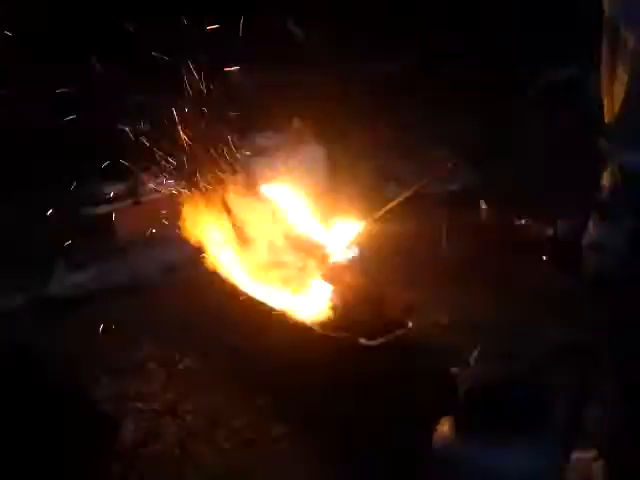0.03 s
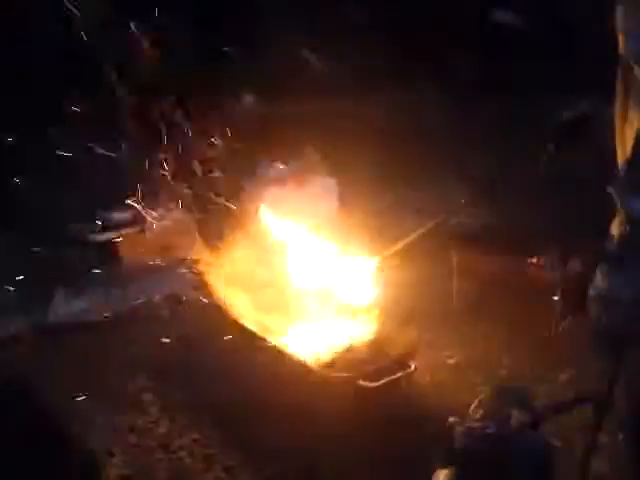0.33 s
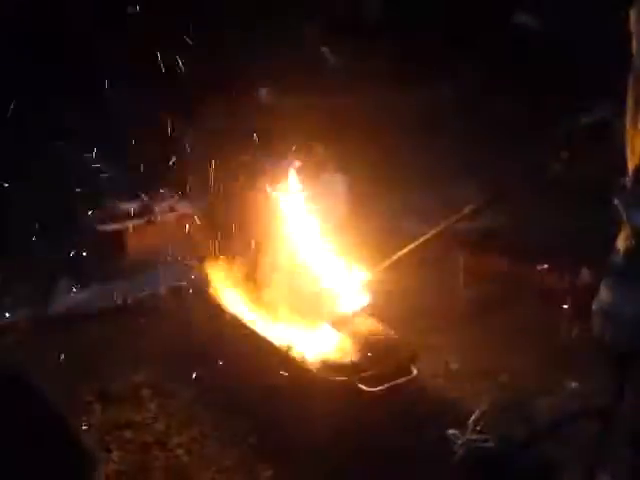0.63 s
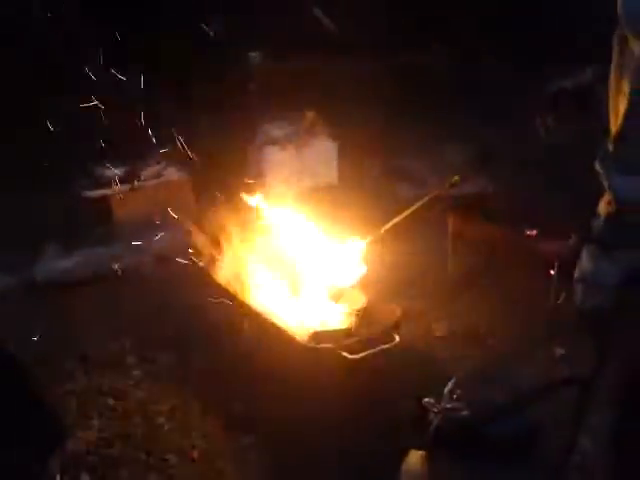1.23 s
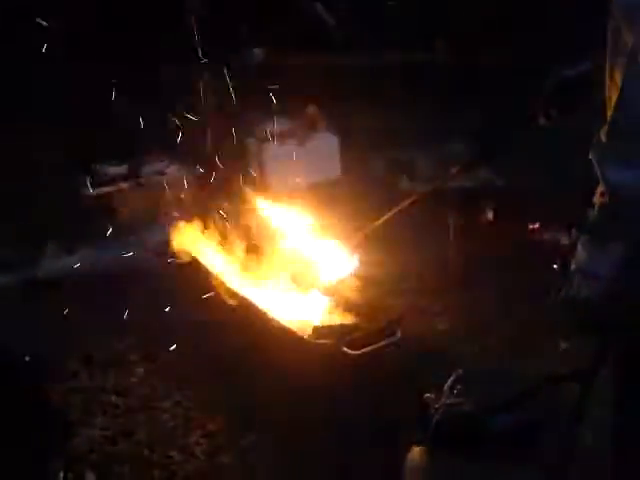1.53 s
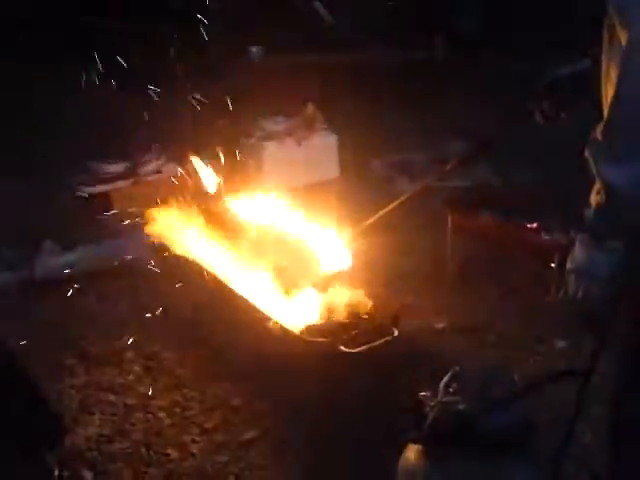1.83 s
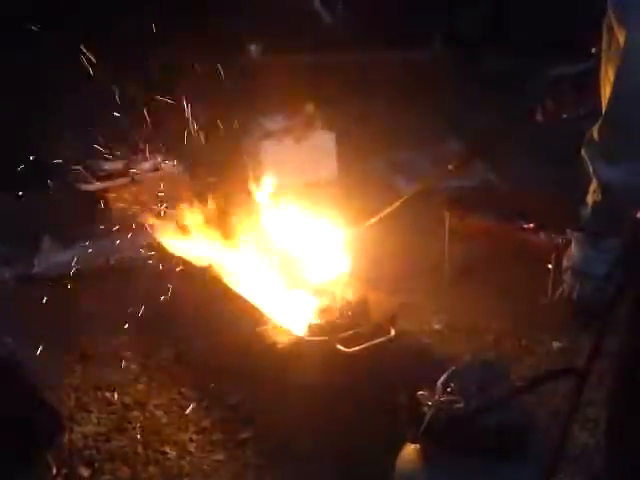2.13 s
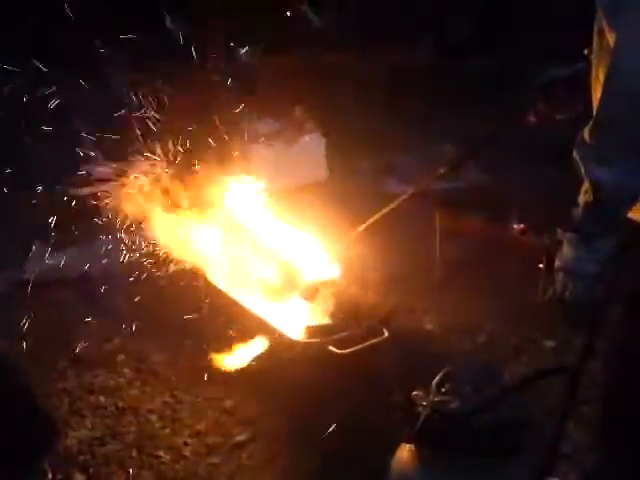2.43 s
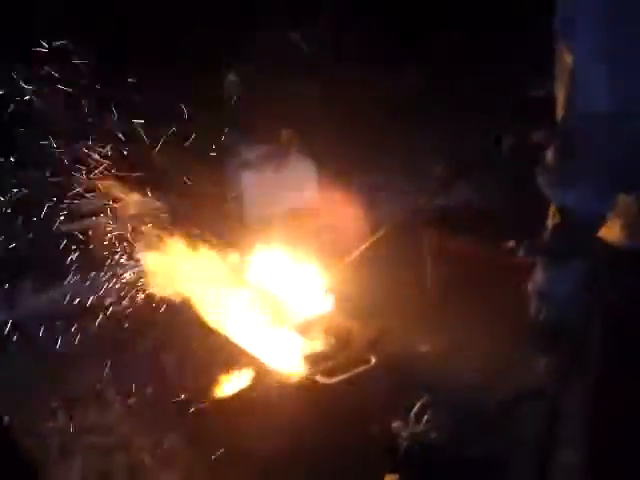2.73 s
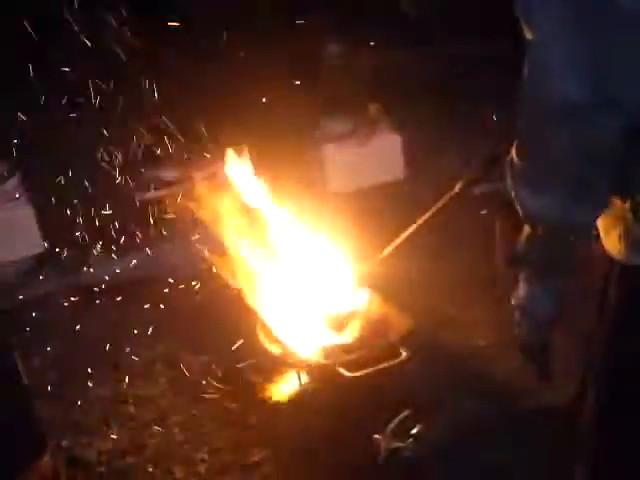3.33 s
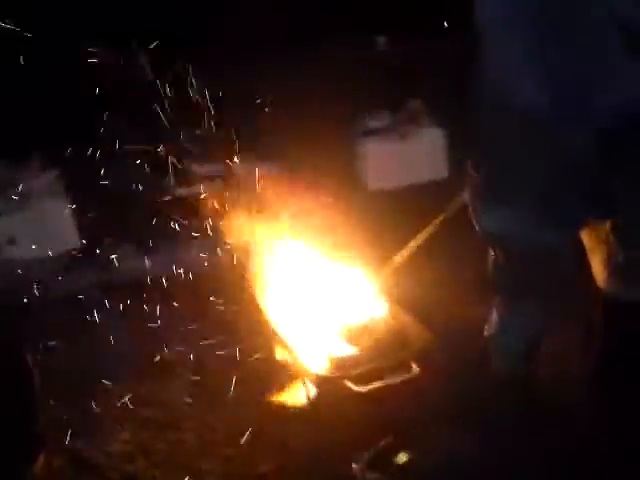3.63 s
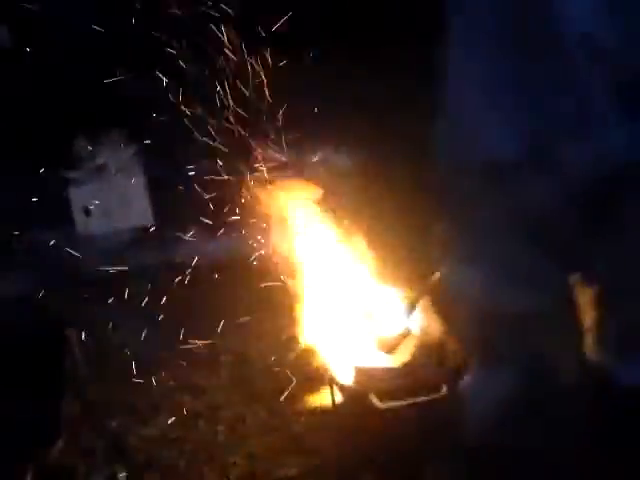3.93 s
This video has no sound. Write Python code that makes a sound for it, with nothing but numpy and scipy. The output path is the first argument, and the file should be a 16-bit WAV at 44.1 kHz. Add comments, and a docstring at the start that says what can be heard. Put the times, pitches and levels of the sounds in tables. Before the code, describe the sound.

A strong charcoal fire roars outdoors as forced air swells through the coals with a breathy whistle. Sharp snaps break in where the close microphone overloads, a few at first, then in thicker clusters.

```python
"""Outdoors at night, a narrow-band microphone stands close to a charcoal fire in a trough.
From the start, turbulence roars in a deep fixed body, and strokes of forced air swell and glide in
three breathy resonances. At the height of the surges the microphone overloads and the roar breaks into
sharp snaps: a few at first, then clusters near 1.6 s and 2.3 s. Faint ticks dot the loudest stretches.
From 3.2 s to 3.7 s the snaps come thickest, four with a dull thump; then the fire roars on."""
import sys
import numpy as np
from scipy.fft import rfft, irfft, next_fast_len
from scipy.io import wavfile
from scipy.ndimage import uniform_filter1d, map_coordinates

SR = 44100
rng = np.random.default_rng(int(sys.argv[2]) if len(sys.argv) > 2 else 0)


def digitize_waveform(pressure):
    """Quantize a signal to 16-bit integers and store it at the path in sys.argv[1].

    Rows of a 2-D input are taken as channels; values are limited to [-1, 1].
    """
    field = np.atleast_2d(pressure).T
    bounded = np.clip(field, -1, 1)
    quanta = np.round(bounded * 32767).astype(np.int16)
    wavfile.write(sys.argv[1], SR, quanta)


N = 176400  # 4 s


def amp(db):
    """Decibels to gain."""
    return 10 ** (np.asarray(db) / 20)


def unit_rms(x):
    """Scale to rms 1."""
    return x / np.sqrt(np.mean(x ** 2) + 1e-20)


def curves(rows):
    """One value per sample for each column after the time."""
    times, *columns = np.transpose(rows)
    return [np.interp(np.arange(N) / SR, times, column) for column in columns]


def wobble(knots_per_s):
    """A smooth random curve."""
    return map_coordinates(rng.standard_normal(1024), [np.arange(N) * knots_per_s / SR], mode="wrap")


def filtered(x, response):
    """Filter x by a gain given as a function of frequency in Hz."""
    size = next_fast_len(N + SR // 2)
    hz = np.fft.rfftfreq(size, 1 / SR)
    return irfft(rfft(x, size) * response(hz), size)[..., :N]


def coloured(x, spectrum):
    """Shape x by (Hz, dB) points, falling 12 dB an octave above the last one."""
    points_hz, points_db = np.transpose(spectrum)

    def response(hz):
        gain_db = np.interp(np.log(hz + 1), np.log(points_hz), points_db)
        return amp(gain_db) / np.maximum(hz / points_hz[-1], 1) ** 2
    return filtered(x, response)


def low_pass(x, edge_hz):
    """A steep upper band edge."""
    return filtered(x, lambda hz: 1 / np.sqrt(1 + (hz / edge_hz) ** 70))


def overload(x, ceiling):
    """The microphone rounds off peaks as they near its ceiling."""
    return x / (1 + (x / ceiling) ** 8) ** (1 / 8)


def turbulence(levels, spectrum, flutter_db, flutter_per_s):
    """Turbulence in a fixed body: noise that follows a level curve and flutters."""
    level_db, = curves(levels)
    gain = amp(level_db + flutter_db * wobble(flutter_per_s))
    return gain * unit_rms(coloured(rng.standard_normal(N), spectrum))


def resonance(track, half_width_hz, skirt_slope, waver_hz):
    """Turbulence in one breathy resonance: a narrow noise band that glides along a track and wavers."""
    centre_hz, level_db = curves(track)
    noise = rng.standard_normal((2, N))
    in_phase, quadrature = filtered(noise, lambda hz: (1 + (hz / half_width_hz) ** skirt_slope) ** -.5)
    phase = 2 * np.pi * np.cumsum(centre_hz + waver_hz * wobble(10)) / SR
    return amp(level_db) * unit_rms(in_phase * np.cos(phase) + quadrature * np.sin(phase))


# Surges of the flames' deep, middle and hissing bands, close up (time [s], relative level [dB])
DEEP_LEVELS = [(0.0, -14.5), (0.32, -16), (0.41, -18.5), (0.5, -14.5), (0.72, -21), (0.8, -13.5),
               (1.08, -20), (1.22, -16), (1.73, -14.5), (1.93, -24.5), (1.95, -16.5), (2.08, -21),
               (2.16, -15), (2.82, -14.5), (2.83, -18), (3.32, -11.5), (3.98, -15), (4.0, -6.5)]
MIDDLE_LEVELS = [(0.0, -30), (1.08, -40), (1.29, -25), (1.39, -35.5), (1.61, -24), (1.92, -42.5),
                 (2.27, -24), (2.83, -28), (3.27, -21.5), (4.0, -27.5)]
HISS_LEVELS = [(0, -27), (.35, -33), (.8, -29), (1.5, -28.5), (1.95, -34), (2.35, -25), (2.6, -30),
               (3.25, -28.5), (3.55, -29.5), (3.75, -31), (4, -29.5)]
# Colour of the same three bands at the trough (frequency [Hz], relative level [dB])
DEEP_SPECTRUM = [(25, -37), (90, -37), (150, -23), (225, -9.5), (310, -11), (430, -6), (520, -2.5),
                 (605, 1), (720, -1.5), (860, -11.5), (1250, -23), (2000, -34.5)]
MIDDLE_SPECTRUM = [(600, -25), (850, -5), (1150, -4.5), (1350, 0), (1520, -5.5), (2000, -26)]
HISS_SPECTRUM = [(1800, -25), (2400, -4), (2600, 1), (2860, -5), (3150, 1.5), (3370, -6), (3540, 0),
                 (3720, -17.5), (4000, -21.5), (4400, -19)]


def flames():
    """Turbulent flames: a deep roar, a middle band that fills in as the fire grows, and hiss above."""
    deep = turbulence(DEEP_LEVELS, DEEP_SPECTRUM, flutter_db=.5, flutter_per_s=21)
    middle = turbulence(MIDDLE_LEVELS, MIDDLE_SPECTRUM, flutter_db=.94, flutter_per_s=16)
    hiss = turbulence(HISS_LEVELS, HISS_SPECTRUM, flutter_db=1.75, flutter_per_s=20)
    return amp(1) * deep + amp(.5) * middle + amp(1) * hiss


# Resonances of the air in the coals, close up (time [s], centre [Hz], relative level [dB])
JET_TRACK = [(0.0, 1710, -23.5), (0.01, 1680, -16.5), (0.12, 1600, -16), (0.22, 1820, -22),
             (0.31, 1790, -21), (0.38, 1763, -33), (0.69, 1714, -25.5), (0.71, 1718, -18.5),
             (0.86, 1650, -17), (0.98, 1750, -24), (1.36, 1710, -24), (1.65, 1685, -13),
             (1.89, 1760, -26.5), (2.31, 1600, -15), (2.82, 1708, -21.5), (3.09, 1449, -17),
             (3.16, 1540, -25.5), (3.25, 1443, -20.5), (3.31, 1594, -21), (3.38, 1480, -24),
             (3.48, 1745, -18), (3.55, 1553, -19), (3.91, 1717, -27), (4.0, 1697, -19)]
WHISTLE_TRACK = [(0.0, 923, -48.5), (0.13, 1030, -18.5), (0.3, 1010, -27.5), (0.56, 1020, -21.5),
                 (0.63, 967, -32.5), (0.91, 954, -19), (0.95, 991, -30), (1.22, 968, -12), (1.44, 961, -26),
                 (1.45, 991, -24), (1.76, 961, -22), (1.9, 962, -44), (2.28, 1020, -33), (3.02, 965, -24),
                 (3.35, 1020, -19.5), (3.85, 977, -35.5), (3.95, 1060, -25), (4.0, 975, -27)]
RUSH_TRACK = [(0.0, 1895, -28), (0.52, 2066, -21), (1.63, 1980, -21), (2.46, 1983, -26), (2.58, 1917, -33),
              (2.83, 1946, -20.5), (2.87, 1910, -32), (3.1, 2034, -23.5), (3.16, 1939, -30),
              (3.21, 2097, -22), (3.24, 1999, -36), (3.49, 1942, -20.5), (3.66, 2052, -19.5),
              (4.0, 1917, -27)]


def forced_air():
    """Forced air sings through the coals: a jet, a hollow whistle below it and a rush above."""
    jet = resonance(JET_TRACK, half_width_hz=110, skirt_slope=3.2, waver_hz=20)
    whistle = resonance(WHISTLE_TRACK, half_width_hz=50, skirt_slope=3.2, waver_hz=6)
    rush = resonance(RUSH_TRACK, half_width_hz=135, skirt_slope=2.7, waver_hz=24.885)
    return amp(1) * jet + amp(-4.5) * whistle + amp(-2) * rush


# Snaps of the overloaded microphone (time [s], cracks [count], relative level of the bright edge [dB])
OVERLOAD_SNAPS = [(0.095, 1, -45), (0.099, 1, -42.5), (0.107, 1, -42), (0.152, 2, -9.5), (0.562, 1, -30.5),
                  (0.738, 1, -47), (0.793, 1, -21.5), (0.81, 1, -47), (0.954, 1, -49), (1.214, 1, -38),
                  (1.269, 1, -44), (1.288, 2, -9.5), (1.332, 1, -27), (1.453, 6, -12), (1.529, 1, -37),
                  (1.566, 1, -46.5), (1.58, 2, -14.5), (1.592, 3, -9), (1.598, 1, -14.5), (1.605, 1, -29),
                  (1.618, 6, -24.5), (1.628, 1, -14.5), (1.64, 1, -28), (1.651, 1, -20.5), (1.679, 1, -20),
                  (2.225, 1, -42.5), (2.242, 1, -12.5), (2.264, 5, -15), (2.277, 1, -10.5), (2.287, 1, -30),
                  (2.31, 1, -18), (2.316, 6, -18.5), (2.32, 2, -10), (2.326, 1, -15.5), (2.344, 1, -45),
                  (2.363, 1, -39), (2.415, 1, -13), (2.423, 1, -44), (2.44, 3, -15.5), (2.453, 2, -13),
                  (2.479, 3, -18), (2.486, 1, -12), (2.722, 1, -38), (2.759, 1, -32), (2.79, 1, -48),
                  (2.812, 1, -10), (2.914, 1, -18), (2.981, 2, -9), (3.024, 1, -14), (3.047, 1, -12.5),
                  (3.104, 3, -16.5), (3.202, 4, -16.5), (3.218, 2, -4.5), (3.24, 1, -18.5), (3.251, 1, -15),
                  (3.275, 1, -11.5), (3.278, 2, -25), (3.302, 2, -12), (3.307, 2, -2.5), (3.315, 2, -13.5),
                  (3.334, 2, -13), (3.338, 1, -13), (3.345, 2, -13), (3.379, 1, -45), (3.386, 2, -12),
                  (3.395, 1, -16), (3.416, 1, -12.5), (3.428, 6, -5), (3.461, 1, -27.5), (3.469, 1, -5.5),
                  (3.481, 2, -13), (3.496, 1, -12.5), (3.512, 2, -8.5), (3.524, 2, -7), (3.53, 1, -17.5),
                  (3.563, 1, -8), (3.587, 2, -23), (3.595, 3, -18.5), (3.617, 2, -11.5), (3.622, 1, -29),
                  (3.629, 1, -51), (3.633, 1, -16), (3.64, 5, -22.5), (3.655, 2, -10)]
# Colour of the snaps' bright edges and of the ticks (frequency [Hz], relative level [dB])
EDGE_SPECTRUM = [(3800, -40), (4600, 0.5), (6300, 0), (9000, -6.5), (12000, -11.5), (16000, -17)]


def snaps(roar, reach_s=.0018, step_samples=5):
    """Each overload crack throws a crest of the roar to the opposite side; hard ones have a bright edge."""
    cracks, edges = np.zeros((2, N))
    sizes = 8.5 * amp(.5 * rng.standard_normal(len(OVERLOAD_SNAPS)))  # far past the microphone's ceiling
    for (time_s, count, edge_db), size in zip(OVERLOAD_SNAPS, sizes):
        nearby = np.arange(round((time_s - reach_s) * SR), round((time_s + reach_s) * SR), step_samples)
        highest_first = np.argsort(-np.abs(roar[nearby]))
        crests = nearby[highest_first[:count]]
        side = np.sign(roar[crests])
        cracks[crests] -= size * side
        edges[crests] += side * amp(edge_db + 5.5) / np.sqrt(len(crests))
    return cracks, coloured(edges, EDGE_SPECTRUM)


def ticks(roar, mean_per_s=17):
    """Faint bright ticks that crowd together where the roar is loudest."""
    power = np.abs(uniform_filter1d(roar ** 2, size=8192))
    crowding = power ** 9
    hits = rng.random(N) < mean_per_s / SR * crowding / crowding.mean()
    strengths = amp(-34 + 5.5 * rng.standard_normal(N))
    return coloured(hits * strengths, EDGE_SPECTRUM)


# Dull thumps at the microphone, late in the fire's surging (time [s], level before overload [dB])
SNAP_THUMPS = [(3.304, -12), (3.346, -12.5), (3.386, -19), (3.427, -20)]


def thumps(half_length_s=.0016):
    """A short one-sided push under four of the heavy snaps."""
    t = np.arange(N) / SR
    return -sum(amp(db) * np.exp(-.5 * ((t - time_s) / half_length_s) ** 2) for time_s, db in SNAP_THUMPS)


def scene():
    """The fire overloads the close microphone's narrow channel; only edges and ticks reach above it."""
    roar = overload(flames() + forced_air(), ceiling=.66)
    cracks, edges = snaps(roar)
    narrow = low_pass(roar + cracks + thumps(), edge_hz=4020)
    squashed = overload(narrow, ceiling=.72)
    body = low_pass(squashed, edge_hz=4500)
    return (body + edges + ticks(roar))[None]


def record(dry):
    """The recorder keeps nothing above 15.9 kHz."""
    return filtered(dry, lambda hz: hz < 15900)


dry = scene()
out = record(dry)
digitize_waveform(out)
```